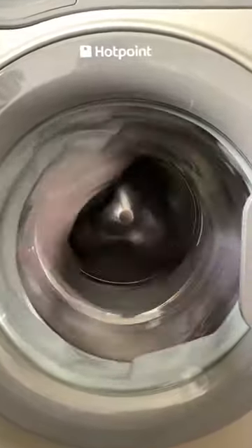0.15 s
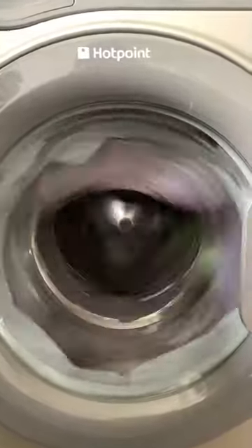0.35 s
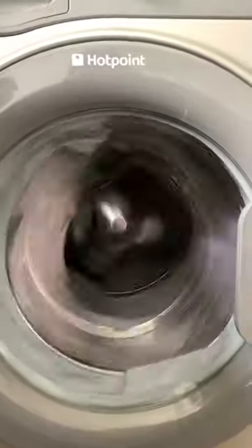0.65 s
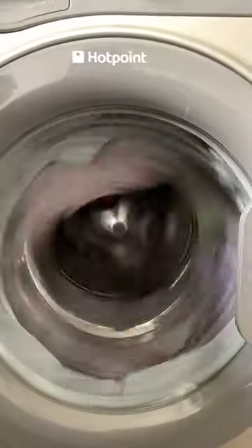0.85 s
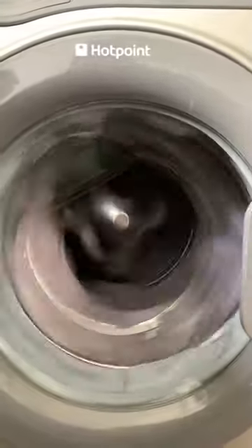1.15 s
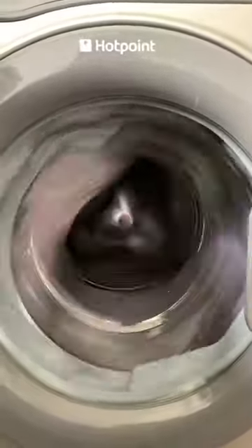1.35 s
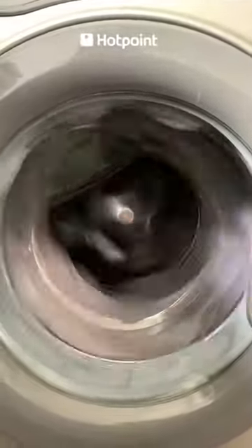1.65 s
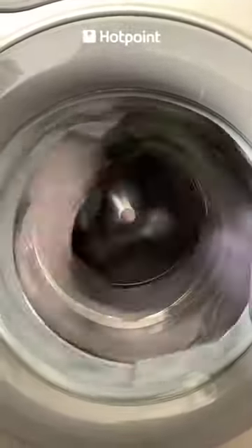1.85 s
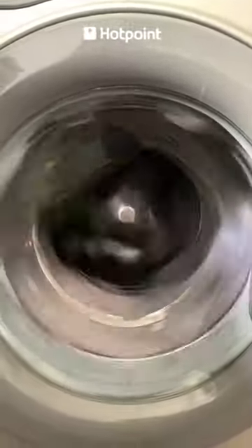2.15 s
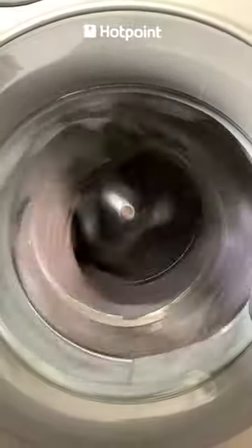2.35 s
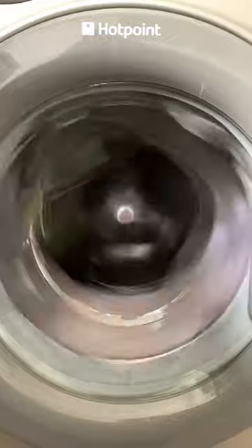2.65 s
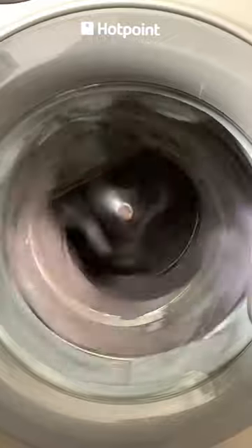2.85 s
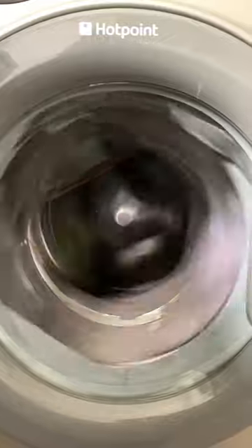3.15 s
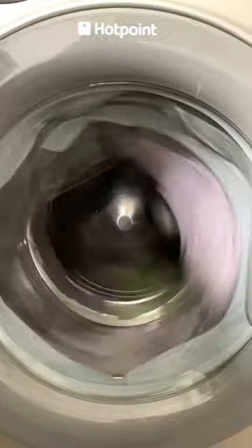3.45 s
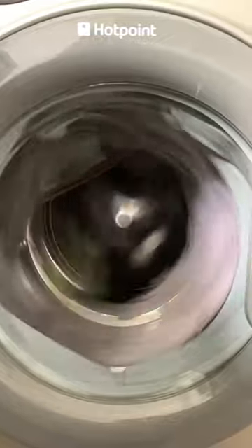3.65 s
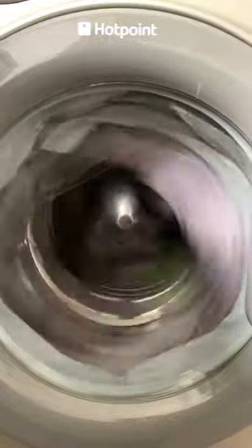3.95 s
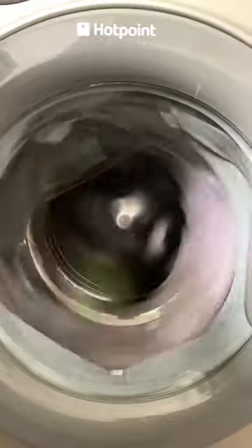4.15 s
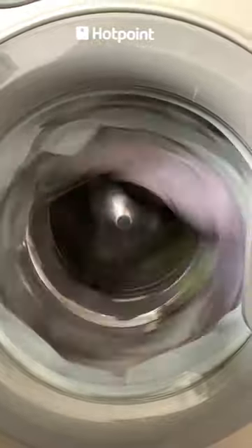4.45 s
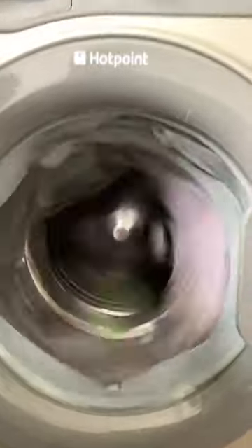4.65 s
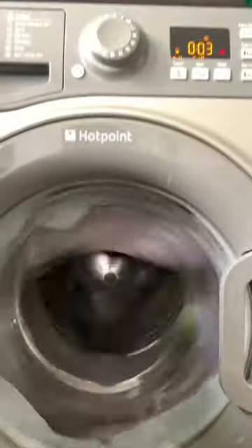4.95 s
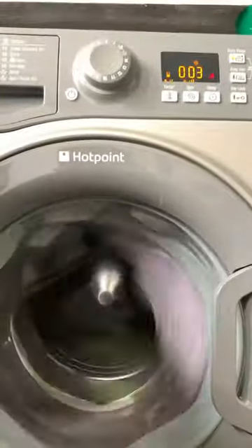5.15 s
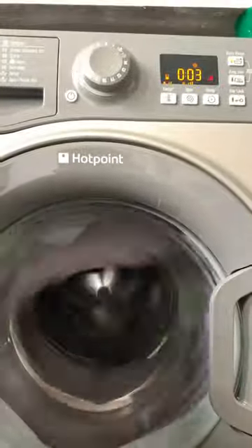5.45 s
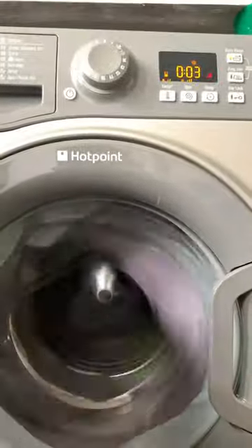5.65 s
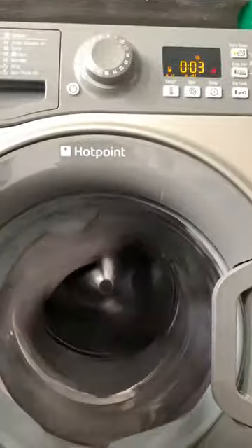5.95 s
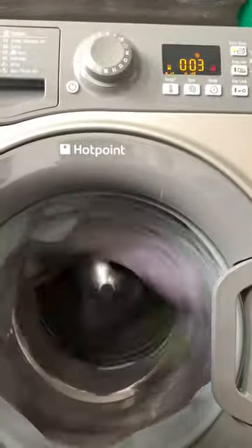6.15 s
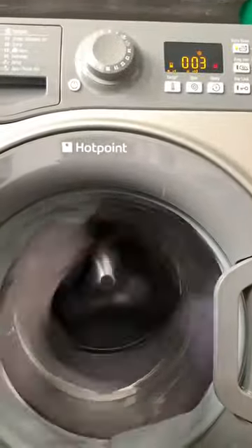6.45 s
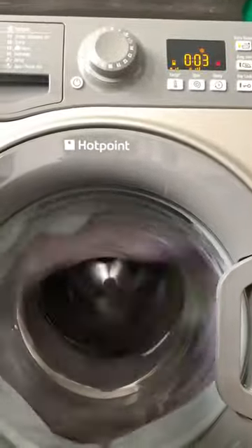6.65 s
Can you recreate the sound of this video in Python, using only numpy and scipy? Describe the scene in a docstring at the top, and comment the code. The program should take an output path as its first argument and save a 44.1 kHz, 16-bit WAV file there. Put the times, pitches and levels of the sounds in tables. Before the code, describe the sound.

Fast rhythmic washing machine drumming indoors: boomy tub thuds, hollow door knocks and wet rubbery swishes repeating four times every second.

```python
"""A small room where a front-loading washing machine spins a wet, unbalanced load about four times a second.
On every turn laundry thuds in the tub, knocks on the door and scrubs the seal; a lump sticks out for a while.
Soft impulses ring banks of resonances for thuds and knocks; grainy coloured noise makes scrubs and slaps.
A small scratch of noise ticks once a turn; now and then a heavy knot clunks or a loose end flaps wetly.
A phone with two microphone ports is close to the door, then drawn back: boom and ringing change balance."""
import sys
import numpy as np
from scipy import signal
from scipy.fft import rfft, irfft, next_fast_len
from scipy.io import wavfile
from scipy.ndimage import uniform_filter1d

SR = 44100
rng = np.random.default_rng(int(sys.argv[2]) if len(sys.argv) > 2 else 0)


def generate_wav(signal):
    """Clip the signal to [-1, 1] and save it as 16-bit WAV at the path in sys.argv[1]."""
    frames = np.transpose(np.atleast_2d(signal))
    scaled = np.clip(frames, -1, 1) * 32767
    pcm = np.round(scaled).astype(np.int16)
    wavfile.write(sys.argv[1], SR, pcm)


N = 300321
TIME = np.arange(N) / SR
DRAWN_BACK_S = 4.5  # the balance switches at once
FOLDS_LEAD_S = 0.072  # the folds start to pass this long before the load meets the seal

# how hard the load leans on tub and seal: (time [s], thud level [dB], rub level [dB])
WEIGHT = [(0.1, 1, -2.5), (0.86, -2.5, -2), (1.1, -3, -1.5), (1.35, -1, -1), (3.0, 0.1, -0.9),
          (4.7, -0.4, -0.5), (5.0, 0, -1.5), (5.5, 1, -2), (6.7, -0.5, -2)]
# how far a lump of laundry sticks out: (time [s], level [dB])
LUMP_OUT = [(0.38, -7.5), (0.62, -7), (0.84, 12.5), (4.74, 0.5), (5.0, -10), (6.7, -4.5)]
# bright spectrum of smacks and scuffs: (frequency [Hz], level [dB])
SMACK_SPECTRUM = [(800, 3.5), (1500, 10.5), (2150, 2.5), (2500, -1), (3500, 2.5), (6000, -14.5),
                  (9000, -24.5), (13000, -22), (16000, -42)]
# spectrum of fine water spray: (frequency [Hz], level [dB])
SPRAY_SPECTRUM = [(4000, -20), (8000, 0), (12000, -1.5), (14500, -6), (15700, -6)]
# the load slaps the door as it lands: (time [s], dull thwack level [dB], bright smack level [dB])
LOAD_SLAP = [(0.14, -14, -36), (0.38, -17.5, -42), (0.62, -16.5, -40), (1.1, -16, -60), (1.34, -17.5, -50),
             (1.58, -22, -50), (1.83, -21.5, -58), (2.07, -17, -54), (2.31, -18.5, -52), (2.802, -18, -61),
             (3.7, -26.5, -60), (4.7, -22.5, -52), (4.98, -16, -52), (5.47, -21, -45), (6.698, -19, -44)]
# a loose end flaps against the door:
# (time [s], dull thwack level [dB], bright smack level [dB], spray level [dB])
FLAPS = [(0.382, -32, -60, -40), (0.866, -43, -40, -56), (5.204, -25, -35.5, -55), (5.447, -38, -33.5, -47),
         (5.958, -31, -39.5, -59), (6.436, -29, -48, -58)]
# harder ring of the door frame: (frequency [Hz], width [Hz], level [dB])
FRAME_MODES = [(570, 50, -8), (685.7, 37, 2), (811.4, 48, 2), (901, 55, 0.5), (1170, 39, -7),
               (1254, 42, -5.5), (1501, 70, -10), (1720, 61, -17), (2182, 43, -15)]


def from_db(db):
    """Decibels to gain."""
    return 10 ** (np.asarray(db) / 20)


def rms_one(x):
    """Scale to an rms of 1."""
    return x / np.sqrt(np.mean(x ** 2) + 1e-20)


def at_hz(points, hz):
    """Read a table on a log-frequency axis."""
    f, value = np.transpose(points)
    return np.interp(np.log(hz + 1e-6), np.log(f), value)


def read(curve, times):
    """The columns of a curve at given times."""
    s, *columns = np.transpose(curve)
    return [np.interp(times, s, c) for c in columns]


def since(times):
    """For every sample: which of these moments came last, and the seconds since."""
    last = np.clip(np.searchsorted(times, TIME) - 1, 0, None)
    return last, TIME - times[last]


def close_or_back(close_db, back_db):
    """Level in dB over time: one value close to the door, another once drawn back."""
    return np.where(TIME > DRAWN_BACK_S, back_db, close_db)


def colour(x, spectrum):
    """Give a signal a spectrum that falls steeply above its last point."""
    size = next_fast_len(x.shape[-1] + SR // 10)
    hz = np.fft.rfftfreq(size, 1 / SR)
    above = np.maximum(hz / spectrum[-1][0], 1) ** -4
    shaped = rfft(x, size) * from_db(at_hz(spectrum, hz)) * above
    return irfft(shaped, size)[..., :x.shape[-1]]


def drift(rate):
    """Smooth, bounded chance with a spread of 1; rate is in new values per second."""
    steps = np.clip(rng.standard_normal(SR), -2, 2)
    return rms_one(np.interp(TIME * rate, np.arange(SR), steps))


def wide(noise, spread_db):
    """The seal is a large ring, so each port hears a share of noise of its own."""
    return noise + from_db(spread_db) * rng.standard_normal((2, N))


def resonance(x, hz, width_hz):
    """One mode, gain 1 on top."""
    r = np.exp(-np.pi * width_hz / SR)
    zeros = np.array([1, 0, -1]) * (1 - r * r) / 2
    poles = [1, -2 * r * np.cos(2 * np.pi * hz / SR), r * r]
    return signal.lfilter(zeros, poles, x + 1e-18)


def modes(x, table):
    """Drive a set of modes; each is heard at a new strength once the phone is drawn back."""
    return sum(from_db(close_or_back(close_db, back_db)) * resonance(x, hz, width)
               for hz, width, close_db, back_db in table)


def clicks(times, db):
    """Single impulses at given times."""
    out = np.zeros(N)
    at = np.round(np.ravel(times) * SR).astype(int)
    inside = (at >= 0) & (at < N)
    np.add.at(out, at[inside], from_db(np.ravel(db))[inside])
    return out


def fade(x, decay_s):
    """Each impulse jumps up and dies away."""
    return signal.lfilter([1], [1, -np.exp(-1 / (decay_s * SR))], x + 1e-18)


def struck(force, table, soft_hz, spot_db=2.0):
    """Softened blows ring a set of modes at rms 1; the spot they strike shifts every 20 ms, favouring other
    modes."""
    force = signal.sosfilt(signal.butter(2, soft_hz, fs=SR, output="sos"), force + 1e-18)
    spot = (TIME * 50).astype(int)  # a new spot every 20 ms
    chance = np.clip(rng.standard_normal((len(table), spot[-1] + 1)), -2, 2)
    gains = from_db(spot_db * chance)
    ring = 0
    for k, (hz, width, db) in enumerate(table):
        sign = (-1) ** k  # neighbouring modes ring in opposite phase
        ring = ring + sign * from_db(db) * resonance(force * gains[k, spot], hz, width)
    return rms_one(ring)


def friction(noise, spectrum, grain_db, grain_rate):
    """Cloth grips and slips, so its noise comes in tiny bursts."""
    return rms_one(colour(noise * from_db(grain_db * drift(grain_rate)), spectrum))


def meetings():
    """The moments when the load meets the seal, once a turn, starting one turn early."""
    # speed of the drum: (time [s], speed [turns per minute])
    speed = [(0, 251.3), (2.2, 247.48), (4.4, 247.12), (5.4, 245.92), (6.8, 251.62)]
    first_meeting_s = 0.143
    t = np.arange(-SR // 2, N) / SR
    turns = np.cumsum(np.interp(t, *np.transpose(speed))) / 60 / SR
    turns -= np.interp(first_meeting_s, t, turns)
    return np.interp(np.arange(-1, turns[-1]), turns, t)


def tucked_in(times):
    """0 while the lump sticks out, nearing 1 as it lies flat."""
    return np.clip(1 - from_db(read(LUMP_OUT, times)[0]), 0, 1)


def folds(met, likeness):
    """The same folds of cloth pass on every turn, so each turn's noise resembles the last by a set likeness."""
    turn, age = since(met - FOLDS_LEAD_S)
    keep = np.clip(likeness, 0, .99)
    texture = rng.standard_normal((len(met), SR // 2))
    for k in range(1, len(texture)):
        texture[k] = keep * texture[k - 1] + np.sqrt(1 - keep ** 2) * texture[k]
    return texture[turn, np.round(age * SR).astype(int)]


def rumble(met, level_db, lump_share, drawn_back_db):
    """The rolling drum shakes the cabinet, slightly more while the lump makes the load lopsided."""
    # spectrum: (frequency [Hz], level [dB])
    rumble_spectrum = [(15, -30), (28, -17), (42, 1.5), (62, 1), (110, 0), (180, -3), (300, -28),
                       (600, -57)]
    lopsided_db = lump_share * read(LUMP_OUT, TIME)[0]
    shake = from_db(level_db + lopsided_db + close_or_back(0, drawn_back_db))
    return shake * rms_one(colour(folds(met, likeness=0.75), rumble_spectrum))


def contact(met):
    """Each rub swells, holds and dies away; gives the strength of drone, scrub and hiss."""
    # cloth passing over the seal in every turn: leading folds, landing, drag, trailing folds
    # (start after the load meets the seal [s], attack [s], hold [s], release [s],
    #  drone level [dB], scrub level [dB], hiss level [dB])
    rubs = [(-0.052, 0.017, 0.079, .012, -6.5, -14.5, -14.5),
            (-0.0142, 0.011, 0.0022, 0.0059, 0.5, -3.5, -4), (-0.014, 0.021, 0.036, 0.017, -4.5, -15, -3),
            (0.087, 0.03, 0.036, 0.01, -2, -7, -20)]
    # contact between the rubs: (drone level [dB], scrub level [dB], hiss level [dB])
    light_contact_db = [-5.5, -11.5, -12]
    scatter_db = 0.8  # from turn to turn
    power = from_db(light_contact_db)[:, None] ** 2
    for start, attack, hold, release, *db in rubs:
        turn, age = since(met + start)
        swell = np.clip(age / attack, 0, 1)
        envelope = swell * np.exp(-np.maximum(age - attack - hold, 0) / release)
        strength = from_db(scatter_db * rng.standard_normal(len(met)))
        power = power + (from_db(db)[:, None] * envelope * strength[turn]) ** 2
    return np.sqrt(power)


def seal(met, drone_db, scrub_db, hiss_db, spray_db, judder_db):
    """Laundry drags over the rubber seal: a low drone, a coarse scrub, a wet hiss and fine spray."""
    # spectra: (frequency [Hz], level [dB])
    drone_spectrum = [(90, -15), (170, -9.5), (205, 0.5), (232, -2), (275, -7), (308, -1), (400, -10.5),
                      (520, -14), (900, -38)]
    scrub_spectrum = [(200, -29), (450, -11), (560, 5), (700, 5), (920, -0.5), (1000, -3.5), (1200, -5),
                      (1700, -9), (2400, -15.5), (3400, -20), (5000, -20), (9000, -28.5)]
    hiss_spectrum = [(1000, -19), (2000, 0.5), (2500, 3.5), (3200, 9), (4400, 4), (5500, 2), (7000, -1),
                     (7700, -11.5), (8400, -13.5), (11000, -19.5), (14000, -10), (15200, -36)]
    # judder of the rubber, weak while the lump holds it open: (time [s], level [dB])
    judder_level = [(0.4, -14), (1.3, -33), (4.74, -15), (5.0, -11), (5.5, -2), (6.7, -10.5)]
    # how wet the cloth on the seal is, as the level of its hiss: (time [s], level [dB])
    wetness = [(0.15, 1.5), (0.62, -0.5), (0.9, 1), (1.6, 0.5), (1.85, -1), (2.1, 0), (3.1, -1.5),
               (3.8, -1.5), (4.27, -1), (5.0, -2.5), (5.25, 0), (5.5, 1.5), (5.73, -1.5), (5.97, 1),
               (6.2, -1), (6.45, -1), (6.7, 1)]

    droning, scrubbing, hissing = contact(met)
    pressure = from_db(read(WEIGHT, TIME)[1])

    # the rubber judders as the load lets go of it: an extra swell of the drone
    let_go_s, judder_s = .038, .028
    _, age = since(met - FOLDS_LEAD_S)
    after_meeting = age - FOLDS_LEAD_S
    swell = np.exp(-((after_meeting - let_go_s) / judder_s) ** 2)
    judder = swell * from_db(judder_db + read(judder_level, TIME)[0])
    drone_noise = friction(folds(met, likeness=0.778), drone_spectrum, grain_db=-1.0, grain_rate=260)
    drone = (from_db(drone_db) * droning + judder) * drone_noise

    scrub_noise = wide(folds(met, likeness=0.28), spread_db=-17.5)
    scrub_noise = friction(scrub_noise, scrub_spectrum, grain_db=2.0, grain_rate=300)
    scrub = from_db(scrub_db) * scrubbing * pressure * scrub_noise

    wet_contact = hissing * from_db(read(wetness, TIME)[0]) * pressure
    wet_noise = wide(rng.standard_normal(N), spread_db=-12)
    hiss = from_db(hiss_db) * wet_contact * friction(wet_noise, hiss_spectrum, grain_db=1.0, grain_rate=810)

    # squaring squeezes fine spray out mostly where the wet cloth presses hardest
    spray_noise = friction(rng.standard_normal(N), SPRAY_SPECTRUM, grain_db=-2.5, grain_rate=730)
    spray = from_db(spray_db) * wet_contact ** 2 * spray_noise
    return drone + scrub + hiss + spray


def panels(cloth):
    """The sounds of the cloth set door and cabinet ringing."""
    # (frequency [Hz], width [Hz], level close to the door [dB], level drawn back [dB])
    panel_modes = [(240.3, 38, -0.5, 0), (396, 31, -22, -4.5), (688, 28, -10, -14), (1152, 120, -5.5, -8),
                   (1500, 55, -0.5, -30), (1940, 83, -9, -3.5), (2152, 36, -5, 2), (2870, 34, -9, -4)]
    return modes(cloth, panel_modes)


def patter(met, level_db, per_s, size_db):
    """Small creases flick the door frame at random, harder where the cloth scrubs harder."""
    sizes = from_db(size_db * np.clip(rng.standard_normal(N), -2, 2))
    hits = (rng.random(N) < per_s / SR) * sizes
    return from_db(level_db) * struck(hits * contact(met)[1], FRAME_MODES, soft_hz=2170)


def tub(met, level_db, soft_hz, scatter_db):
    """The blows of each turn, softened by wet cloth, set the tub booming on its springs."""
    # soft blows of the load in every turn:
    # (time after the load meets the seal [s], level [dB], change with the lump fully tucked in [dB])
    thuds = [(-.056, -16, 8), (-.0225, -1.5, -14.5), (-.0088, -1, -16), (.004, -19.5, 14), (0.0122, 1, -5),
             (.0275, -19.5, 4), (0.0387, -12.5, 6), (.073, -8, -40), (.0895, -8, -34), (.1075, -26, -8),
             (.1285, -4.5, -8), (0.1477, -21, 14)]
    # tub on its springs: (frequency [Hz], width [Hz], level close to the door [dB], level drawn back [dB])
    tub_modes = [(42, 7.9, 3.5, -14), (64.37, 11.5, 2, 3.5), (90.3, 25.7, -1.5, 0), (124.4, 17, -3, -12.5),
                 (232, 67, -5.5, -8.5)]
    delay, db, change_db = np.transpose(thuds)[:, :, None]
    chance = scatter_db * rng.standard_normal((len(thuds), len(met)))
    blow_db = read(WEIGHT, met)[0] + db + change_db * tucked_in(met) + chance
    force = clicks(met + delay, blow_db)
    force = signal.sosfilt(signal.butter(4, soft_hz, fs=SR, output="sos"), force + 1e-18)
    return from_db(level_db) * rms_one(modes(force, tub_modes))


def knocks(met, knock_db, clack_db, rap_db, scuff_db, scuff_s, scatter_db, jitter_s):
    """The same knots hit the door on every turn, never quite alike: a hollow knock, a clack, a rap and a scuff."""
    # knots of cloth in every turn: (time after the load meets the seal [s], hollow knock level [dB],
    #  clack level [dB], hard rap level [dB], scuff level [dB], change with the lump fully tucked in [dB])
    knots = [(-.0345, -8.5, 1, -12, 7, -36), (-.018, -16.5, -17.5, -7.5, -2.5, 2),
             (-.001, -1, -3, -4.5, -4, -1.5), (.007, -5.5, -11, -2, 3, -6),
             (0.017, -14.5, -11.5, -6.5, -18, -15), (.028, -12.5, -33, -20, -14, 12.5),
             (0.05, -25.5, -21, -21, -12, -5), (0.092, -19, -22, -5, -3, 0),
             (.118, -16.5, -12, -9.5, -9, 10.5), (.124, -8, -4.5, -10, -27, -3),
             (.141, -8, -4, -8, -12, -3), (.149, -1.5, -1.5, -7.5, -9, 3)]
    # how hard the knots knock: (time [s], level [dB])
    knock_force = [(0.3, -3), (1.2, 2.5), (2.6, 2), (4.7, 1), (5.5, -2.5), (6.7, 1)]
    # hollow ring of the door bowl: (frequency [Hz], width [Hz], level [dB])
    bowl_modes = [(228, 33.2, -0.5), (305, 55, -3.5)]
    # clack of the front panel: (frequency [Hz], width [Hz], level [dB])
    front_modes = [(382.7, 62, 0.11), (423, 73, -1.1)]

    delay, *strengths, change_db = np.transpose(knots)[:, :, None]
    chance = np.clip(rng.standard_normal((len(knots), len(strengths) + 1, len(met))), -2, 2)
    s = met + delay + jitter_s * chance[:, 0]
    force_db = read(knock_force, met)[0] + change_db * tucked_in(met)
    hollow, clack, hard, rough = [clicks(s, force_db + db + scatter_db * chance[:, k + 1])
                                  for k, db in enumerate(strengths)]

    scuff_noise = wide(folds(met, likeness=0.45), spread_db=-36)
    scuffs = fade(rough, scuff_s) * friction(scuff_noise, SMACK_SPECTRUM, grain_db=2.5, grain_rate=440)
    return (from_db(knock_db) * struck(hollow, bowl_modes, soft_hz=550)
            + from_db(clack_db) * struck(clack, front_modes, soft_hz=900)
            + from_db(rap_db) * struck(hard, FRAME_MODES, soft_hz=2200)
            + from_db(scuff_db) * rms_one(scuffs))


def ticks(met, hz, decay_s):
    """A button or zip touches the steel drum once a turn: a short, bright scratch of band-passed noise."""
    # (time [s], level [dB])
    tick_level = [(0.08, -45), (0.32, -40.5), (0.56, -38), (0.8, -48), (1.05, -42), (1.8, -45), (4.44, -48),
                  (4.7, -43.5), (5.17, -39), (5.41, -38), (5.65, -41), (6.6, -44)]
    lead_s, width_hz = 0.0585, 1700  # lead: ahead of the load meeting the seal
    s = met - lead_s
    scratch = resonance(resonance(rng.standard_normal(N), hz, width_hz), hz, width_hz)
    return fade(clicks(s, read(tick_level, s)[0]), decay_s) * rms_one(scratch)


def slaps(met, thwack_db, smack_db, decay_s, drag_db, drag_s, cling_db, cling_s):
    """Wet cloth hits the door with a dull thwack and a bright smack, then drags; a loose end clings longer."""
    # spectrum of the dull thwack: (frequency [Hz], level [dB])
    thwack_spectrum = [(120, -27), (250, 10), (380, -13), (560, -4), (850, 0), (1000, -5.5), (1250, -1),
                       (1700, -20), (3000, -50), (6000, -42)]
    # the lump slaps just ahead of the load: (time [s], dull thwack level [dB], bright smack level [dB])
    lump_slap = [(0.861, -44, -64), (1.069, -20, -39), (1.312, -32, -36), (1.549, -25, -34),
                 (1.79, -23, -37), (2.279, -17.5, -35.5), (2.998, -21.5, -37.5), (3.498, -22, -34.5),
                 (4.22, -23, -35.5), (4.46, -17, -38), (4.708, -27, -40.5), (4.919, -50, -65)]
    lump_lead_s = 0.03675
    each_turn = [[s, *read(curve, s)] for s, curve in ((met, LOAD_SLAP), (met - lump_lead_s, lump_slap))]
    flaps = np.transpose(FLAPS)[:3]
    blows = np.hstack(each_turn + [flaps])
    layers = ((thwack_db, thwack_spectrum), (smack_db, SMACK_SPECTRUM))
    out = 0
    for column, (level_db, spectrum) in enumerate(layers, 1):
        hits = clicks(blows[0], level_db + blows[column])
        drag = from_db(drag_db) * fade(hits, drag_s)
        cling = fade(clicks(flaps[0], level_db + cling_db + flaps[column]), cling_s)
        # soft cloth takes about 3 ms to land
        envelope = uniform_filter1d(fade(hits, decay_s) + drag + cling, size=130)
        noise = wide(folds(met, likeness=0.66), spread_db=-6.5)
        out = out + envelope * friction(noise, spectrum, grain_db=2.5, grain_rate=530)
    return out


def landings(met, level_db, glass_db):
    """Each landing of the load makes the door frame ring; each flap rings the glass."""
    # ring of the door glass: (frequency [Hz], width [Hz], level [dB])
    glass_modes = [(1350, 39, -14), (1720, 55, -5), (2140, 26, 5), (2840, 34, -3)]
    s, _, bright_db, _ = np.transpose(FLAPS)
    frame = struck(clicks(met, read(LOAD_SLAP, met)[0]), FRAME_MODES, soft_hz=2170)
    glass = struck(clicks(s, bright_db), glass_modes, soft_hz=3470)
    return from_db(level_db) * frame + from_db(glass_db) * glass


def clunks(level_db, bounce_s, bounce_db):
    """A heavier knot tumbles against the door in mid-turn and bounces once, ringing a set of modes."""
    # strikes: (time [s], relative level [dB])
    strikes = [(0.266, -17.5), (0.509, -20.5), (0.771, -18), (4.64, -19), (4.862, -19), (5.099, -19),
               (5.374, -20), (5.599, -25.5), (5.835, -16.5), (6.068, -16.5), (6.349, -22)]
    # what they ring: (frequency [Hz], width [Hz], level [dB])
    clunk_modes = [(311, 39, 3), (381, 29, 3.5), (414, 61, 1.5), (696.5, 22, -4), (828, 30, -6),
                   (910, 45, -8.5), (1280, 85, -14)]
    s, db = np.transpose(strikes)
    force = clicks(s, db) + clicks(s + bounce_s, db + bounce_db)
    return from_db(level_db) * struck(force, clunk_modes, soft_hz=1372)


def spurts(level_db, decay_s):
    """Each flap flings a short spurt of drops at the glass: a burst of very grainy, high noise."""
    s, _, _, spray_db = np.transpose(FLAPS)
    envelope = uniform_filter1d(fade(clicks(s, level_db + spray_db), decay_s), size=90)
    return envelope * friction(rng.standard_normal(N), SPRAY_SPECTRUM, grain_db=7, grain_rate=1500)


def room(x):
    """Dense reflections from near walls, different at each port: decaying noise as an echo pattern."""
    # reflections against the direct sound: (frequency [Hz], level [dB])
    room_spectrum = [(60, -83), (180, -17), (350, -11), (800, -7.5), (1500, -4.5), (3000, -8.5),
                     (6000, -72.5), (14000, -70)]
    t60_s = 0.066
    t = TIME[:SR // 2]
    tail = rng.standard_normal((2, len(t))) * from_db(-60 * t / t60_s) * (t > .003)
    tail /= np.sqrt(np.sum(tail ** 2, axis=1, keepdims=True))
    return signal.fftconvolve(colour(x, room_spectrum), tail, axes=1)[:, :N]


def scene():
    """The machine, its ringing panels and the room."""
    met = meetings()
    cloth = seal(met, drone_db=-31, scrub_db=-31.5, hiss_db=-40.5, spray_db=-53.0, judder_db=-26.5)
    cloth = cloth + slaps(met, thwack_db=-10.0, smack_db=2.5, decay_s=0.0063,
                          drag_db=-13.5, drag_s=0.055, cling_db=-15, cling_s=0.045)
    machine = cloth + panels(cloth)
    machine = machine + rumble(met, level_db=-27.5, lump_share=0.021, drawn_back_db=1.0)
    machine = machine + patter(met, level_db=-44.0, per_s=130, size_db=6)
    machine = machine + tub(met, level_db=-22.5, soft_hz=179, scatter_db=0.9)
    machine = machine + knocks(met, knock_db=-32.0, clack_db=-42.0, rap_db=-45.5, scuff_db=-49,
                               scuff_s=0.01, scatter_db=1.9, jitter_s=0.00037)
    machine = machine + ticks(met, hz=5400, decay_s=0.0051)
    machine = machine + landings(met, level_db=-46.0, glass_db=-58.5)
    machine = machine + clunks(level_db=-43.5, bounce_s=0.013, bounce_db=-4)
    machine = machine + spurts(level_db=-3, decay_s=0.0087)
    return machine + room(machine)


def record(dry):
    """The two ports differ in phase and level; the deepest bass and the top are cut."""
    # how far the left port leads the right: (frequency [Hz], phase [radians])
    port_phase = [(20, 0), (1300, -.1), (2400, 1.6), (2900, 1.3), (4700, 3.14), (15300, 18.85)]
    # left minus right: (frequency [Hz], level [dB])
    port_balance = [(100, 0.4), (700, -0.5), (1900, -2.5), (3000, -0.5), (15000, 0)]
    bass_hz, cutoff_hz = 33, 15900
    size = next_fast_len(N + SR // 10)
    hz = np.fft.rfftfreq(size, 1 / SR)
    half = np.array([[.5], [-.5]])  # each port takes half of the difference
    balance = from_db(half * at_hz(port_balance, hz))
    phase = np.exp(1j * half * np.interp(hz, *np.transpose(port_phase)))
    bass_cut = hz ** 8 / (hz ** 8 + bass_hz ** 8)
    heard = irfft(rfft(dry, size) * balance * phase * bass_cut, size)[:, :N]
    return signal.sosfilt(signal.ellip(10, .1, 90, cutoff_hz, fs=SR, output="sos"), heard)


dry = scene()
out = record(dry)
generate_wav(out)
```